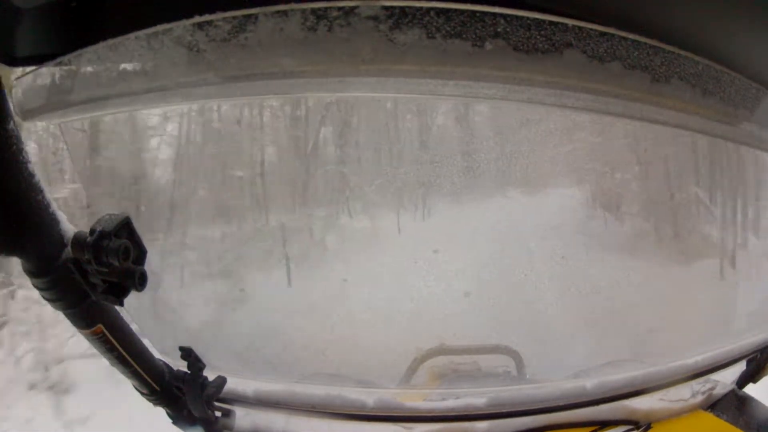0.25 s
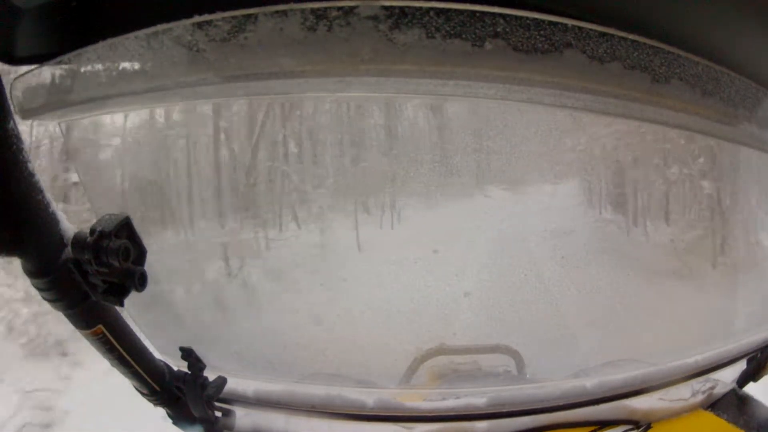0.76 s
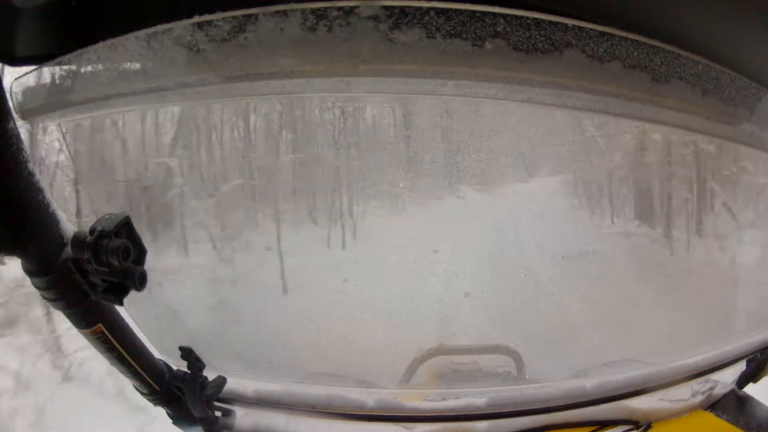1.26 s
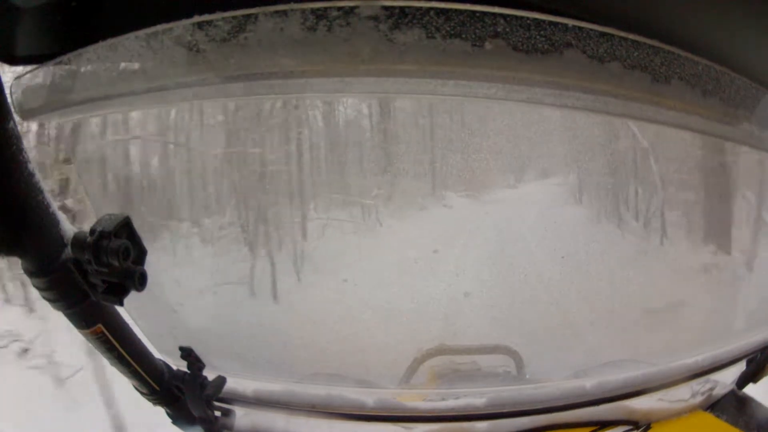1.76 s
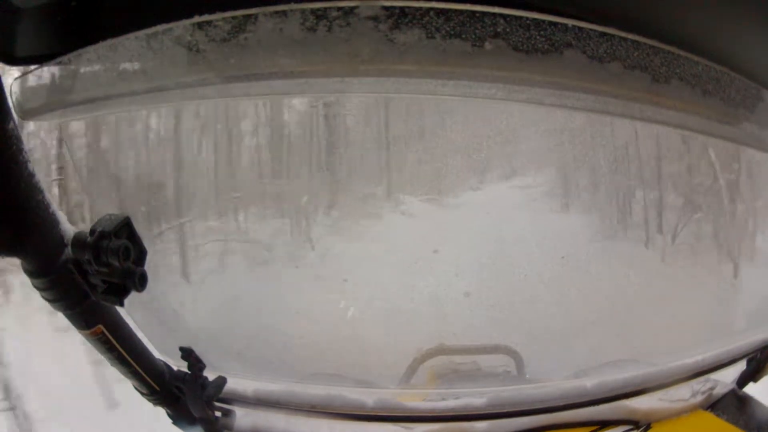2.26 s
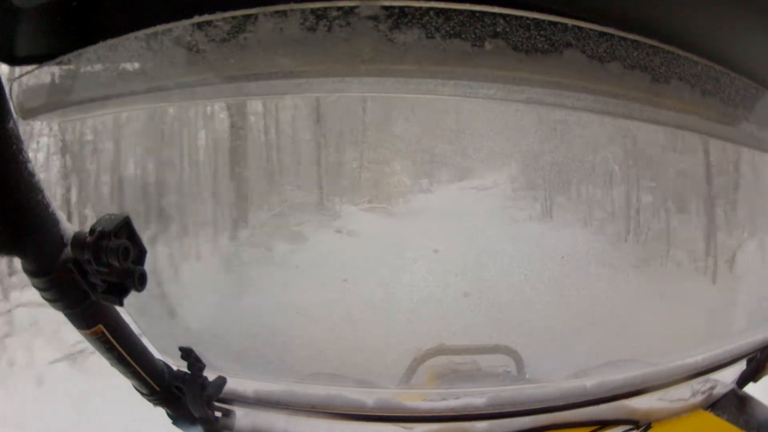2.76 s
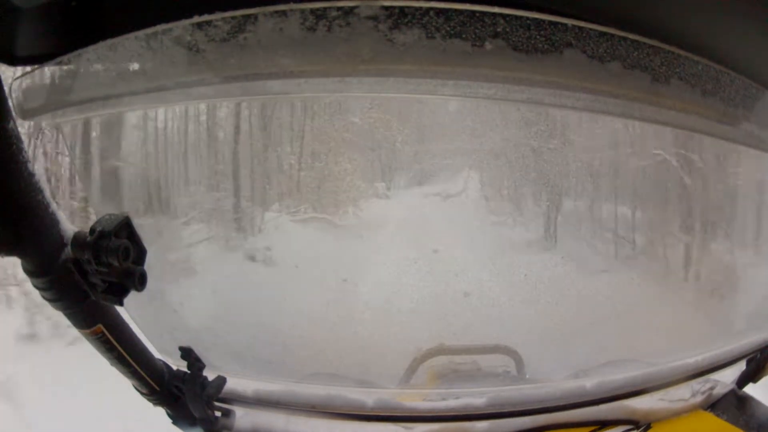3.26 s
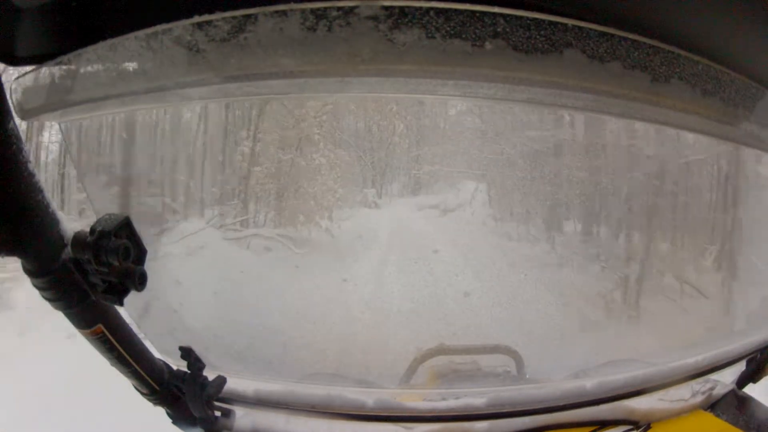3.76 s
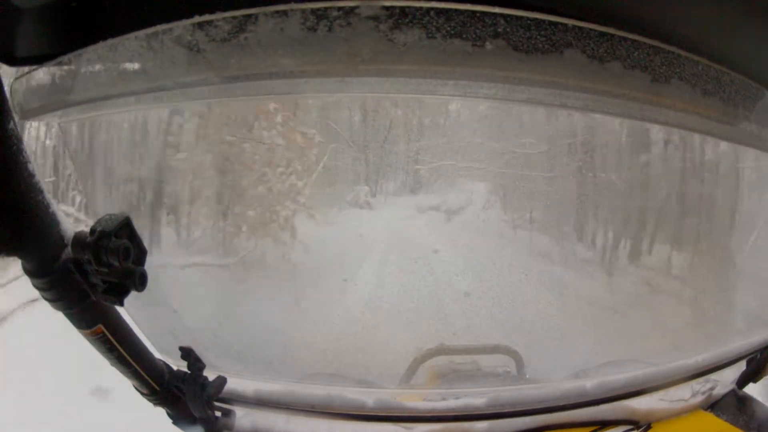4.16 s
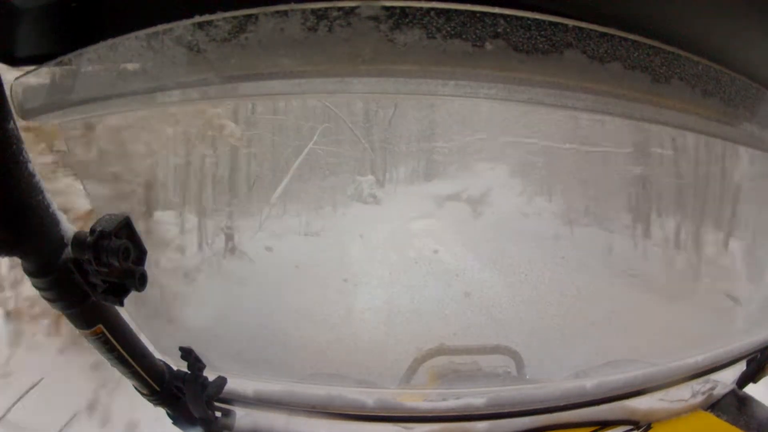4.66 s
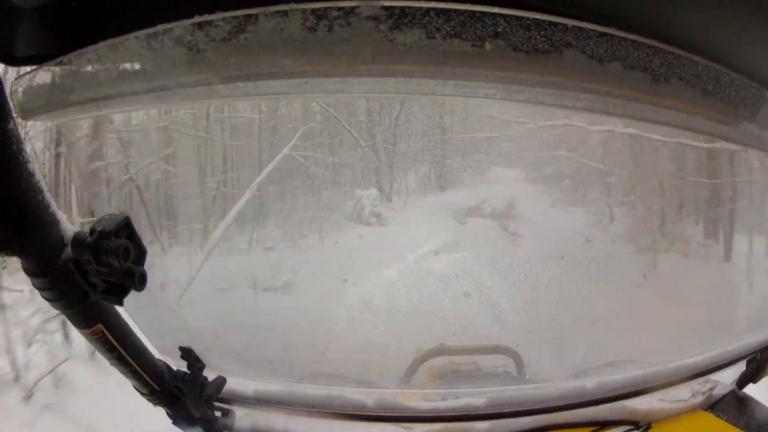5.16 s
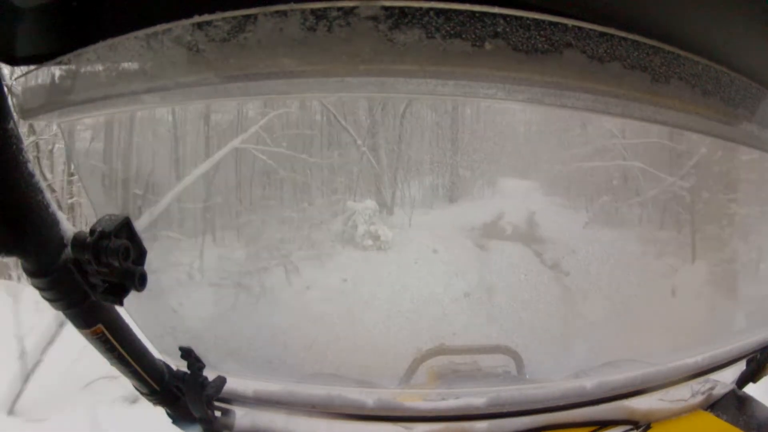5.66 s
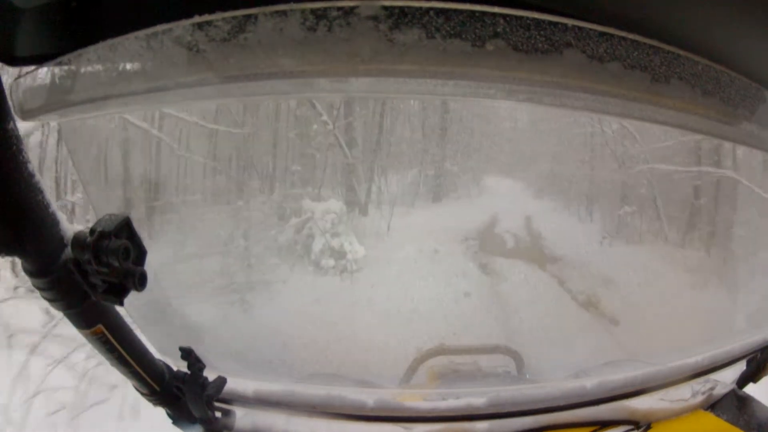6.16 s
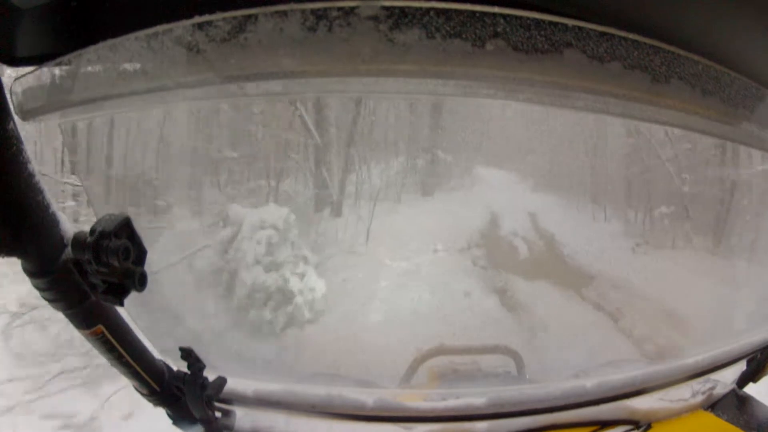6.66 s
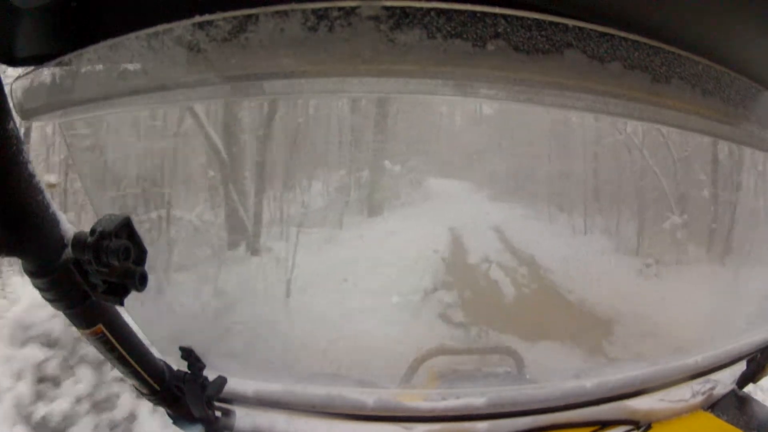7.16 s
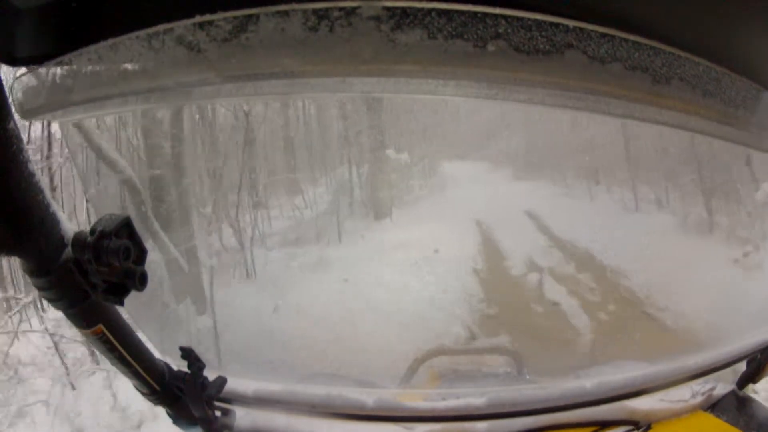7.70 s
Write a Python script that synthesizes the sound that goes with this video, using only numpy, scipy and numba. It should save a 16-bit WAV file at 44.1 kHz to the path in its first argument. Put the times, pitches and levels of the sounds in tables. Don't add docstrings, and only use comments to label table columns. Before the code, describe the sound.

Inside a small off-road vehicle, a two-cylinder engine booms low with a humming driveline and tyre roar. Pitch climbs for about four seconds, then falls to a slower, throbbing near-idle. The camera's hard case buzzes; its loose clamp knocks, densest around the slowdown, then rattles toward the end. Close, boxy, gritty sound that ducks after knocks.

```python
import sys
import numpy as np
from scipy import signal
from scipy.io import wavfile
from scipy.ndimage import uniform_filter1d, minimum_filter1d
from numba import njit

SR = 44100
rng = np.random.default_rng(int(sys.argv[2]) if len(sys.argv) > 2 else 0)


def magnitude_from_level(level_db):
    exponent = np.asarray(level_db, float) / 20
    return 10 ** exponent


def wrap_up_sound(samples):
    columns = np.atleast_2d(samples).T
    tamed = np.clip(columns, -1, 1)
    steps = np.round(tamed * 32767).astype(np.int16)
    wavfile.write(sys.argv[1], SR, steps)


N = 349713

# time in seconds, cycle rate in Hz.
ENGINE_CYCLE_HZ = [(0, 30.6), (.6, 30.6), (1.3, 35.2), (2.5, 35.8), (3.7, 38), (4.4, 35.6), (4.62, 29.7),
                   (4.9, 29.3), (5.2, 27), (5.42, 27.3), (5.62, 25.7), (6, 25.49), (6.25, 24.71),
                   (6.7, 25.23), (6.95, 25.87), (7.25, 25.29), (7.58, 24.84), (7.93, 25.57)]
# time in seconds, load in dB.
THROTTLE_LOAD_DB = [(0, -1), (.55, -2.5), (.9, 1.5), (1.4, 0), (2.1, -1.5), (2.4, 0), (3.0, 1), (3.7, 1.5),
                    (4.4, -0.5), (4.6, -3), (5.05, -3), (5.35, -6), (5.6, -2), (5.9, -12.5), (6.3, -7),
                    (6.8, -4), (7.3, -5.5), (7.93, -1.5)]
# time in seconds, sway in dB.
CAGE_SWAY_DB = [(0, -14), (.1, -14), (.9, -33), (4.55, -29), (4.68, -11), (4.8, -20.5), (5.17, -24),
                (5.27, -3), (5.39, -11), (5.49, -6.5), (5.7, -12.5), (5.97, -18), (6.12, -6), (7.1, -5),
                (7.28, -4), (7.7, -4.5), (7.93, 1.5)]
# multiple of the cycle rate, level in dB.
ENGINE_ORDERS = [(1, -12), (3, 6), (5, 2), (6, 0.5), (7, -4.5), (8, -4.5), (9, -11), (10, 3)]
# time in seconds, rate in Hz.
DRIVELINE_HZ = [(0, 85.1), (.65, 84.5), (.85, 87.3), (1.08, 86.9), (1.22, 92), (1.55, 92.7), (1.8, 96.7),
                (2.1, 96), (2.4, 100.2), (2.8, 100.5), (3.1, 105.6), (3.75, 111.2), (4.35, 112.7),
                (5.08, 92.36), (5.9, 78.2), (6.35, 75.24), (6.75, 70.43), (7.93, 62.4)]
# multiple of the driveline rate, level in dB.
MESH_ORDERS = [(3, -1), (4, -2.5), (5, -9)]
# frequency in Hz, width in Hz, level in dB.
CAB_MODES = [(286.4, 33.7, 1), (323.4, 56, 4), (395, 69, -12.5), (472, 91, -15.5)]
# frequency in Hz, width in Hz, level in dB.
SHELL_MODES = [(798, 92, -11), (1001.8, 66.6, -2.5), (1137, 280, -11), (1535, 500, -16), (1760, 121, -8),
               (1860, 80, -8.5), (2080, 373, -13.5), (2392, 18.6, -15)]
# frequency in Hz, width in Hz, level in dB.
THIN_MODES = [(3200, 580, 0.5), (3575, 380, 0), (3820, 140, -14), (4455, 120, -5), (5310, 600, -17.5),
              (5780, 83, -9.5)]
# start in seconds, end in seconds, frequency in Hz,
# width in Hz, level in dB.
CONTACTS = [(3.05, 4.3, 4400, 330, -43), (3.05, 4.3, 5120, 300, -44), (3.45, 4.33, 3900, 230, -38),
            (3.45, 4.33, 3450, 500, -37), (2.67, 2.86, 4450, 250, -43), (4.372, 4.418, 3500, 1700, -29),
            (5.715, 5.815, 1900, 260, -24), (5.91, 5.995, 1950, 350, -31), (2.53, 2.59, 3400, 1400, -33),
            (2.74, 2.81, 3400, 1400, -32), (4.938, 4.968, 3800, 2200, -33), (4.605, 4.64, 4000, 1800, -36),
            (5.2, 5.31, 3600, 2000, -40), (5.09, 5.18, 4000, 2500, -41), (5.9, 6.0, 3800, 2200, -44),
            (7.12, 7.26, 1850, 300, -25)]
# time in seconds, looseness in dB.
CLAMP_PLAY_DB = [(0, -19.5), (5.6, -9), (6.0, -6.5), (6.35, 1), (6.65, -5), (6.87, -19), (7.15, 4),
                 (7.37, 0), (7.93, 7)]
# time in seconds, peak in dB, ring in Hz, crack minus ring in dB.
CLAMP_KNOCKS = [(.22, -14.5, 1740, -8), (0.4547, -16.5, 1747, -11), (.6249, -2.5, 1770, -8.5),
                (1.1205, -13.5, 1758, -10.5), (2.1287, -17.5, 1770, -13), (2.5369, -13, 2084, -5),
                (2.6219, -8, 1800, -4), (2.7867, -12.5, 1911, -6.5), (3.5142, -3, 1870, 3),
                (3.8347, -11.5, 1770, -27), (4.1007, -2.5, 1739, -13), (4.2943, -7.5, 1860, -19),
                (4.3886, -13, 1970, -3), (4.4017, -9.5, 1840, -4.5), (4.456, -1, 1860, -7.5),
                (4.5378, -5, 2080, -8.5), (4.7001, -5, 1770, -12), (4.8474, -4, 1850, -17),
                (4.9533, -10.5, 1770, -20), (5.0867, -5, 1800, -3.5), (5.305, -8, 1800, -12),
                (5.6273, -13, 1620, -2.5), (5.7144, -12.5, 1850, -2.5), (5.825, -10.5, 2040, 2),
                (5.8538, -15.5, 2310, 2), (5.874, -25.5, 1970, 13), (7.1363, -9.5, 1860, -8),
                (7.208, -11, 1760, -11), (7.2665, -7.5, 1755, -17), (7.4276, -9.5, 1850, -9)]
# time in seconds, peak in dB.
CLAMP_TICKS = [(0.116, -27), (0.7728, -18), (7.392, -24), (6.7229, -18), (2.6856, -16.5), (2.7517, -15.5),
               (6.765, -21), (7.6525, -19), (6.804, -20), (4.625, -15.5), (4.9408, -12.5), (5.188, -20),
               (5.236, -16), (5.5414, -22.5), (5.5952, -20), (5.7923, -17.5), (6.4444, -18.5),
               (6.3037, -20.5), (6.562, -17), (6.9573, -19), (7.1886, -16), (7.3685, -13.5), (7.5088, -14),
               (7.5684, -13.5), (7.6278, -14.5), (7.7106, -17), (7.7477, -10), (7.8273, -8.5), (7.8648, -9),
               (7.888, -6.5)]


def level(x, db):
    return x * magnitude_from_level(db) / np.sqrt(np.mean(x ** 2))


def curves(table):
    s, *columns = np.transpose(table)
    return [np.interp(np.arange(N) / SR, s, c) for c in columns]


@njit
def svf(x, hz, width_hz):
    y, b, l = np.empty(len(x)), 0., 0.
    g, k = np.tan(np.pi * hz / SR), width_hz / hz
    for i in range(len(x)):
        v = (b + g * (x[i] - l)) / (1 + g * (g + k))
        b, l, y[i] = 2 * v - b, l + 2 * g * v, k * v
    return y


@njit
def duck(ear, top, release):
    gain, e = np.empty(len(ear)), 0.
    for i in range(len(ear)):
        e = max(abs(ear[i]), e * release)
        gain[i] = top / max(e, top)
    return gain


def body(x, modes):
    out = 0
    for k, (hz, width_hz, db) in enumerate(modes):
        once = svf(x, 1. * hz, 0.85 * width_hz)
        out = out + (-1) ** k * magnitude_from_level(db) * svf(once, 1. * hz, 0.85 * width_hz)
    return out


def noise():
    return rng.standard_normal(N)


def walk(rate_hz):
    k = int(SR / rate_hz)
    held = np.repeat(rng.standard_normal(N // k + 1), k)
    return 1.36 * uniform_filter1d(uniform_filter1d(held, k), k)[:N]


def stack(turns, orders, wobble_db, rate_hz, jitter_rad):
    return sum(magnitude_from_level(db + wobble_db * walk(rate_hz)) * np.sin(2 * np.pi * k * turns + jitter_rad * walk(rate_hz))
               for k, db in orders)


def knocks():
    out, t = np.zeros(N + 4000), np.arange(4000) / SR
    knock_ms, tick_ms, tick_hz, tick_crack_db = 3, 3.2, 1850, -5
    hits = [tuple(row) + (knock_ms,) for row in CLAMP_KNOCKS]
    hits += [(s, db, tick_hz, tick_crack_db, tick_ms) for s, db in CLAMP_TICKS]
    for s, peak_db, hz, crack_db, blow_ms in hits:
        blow = rng.standard_normal(len(t)) * np.minimum(t / 0.0012, 1) * np.exp(-1000 * t / blow_ms)
        grit = rng.standard_normal(len(t)) ** 3
        blow += .09 * grit * np.minimum(t / .002, 1) * np.exp(-t / .011)
        ring = body(blow, [(hz, 520, 0), (1.04 * hz, 110, -2)]) + .3 * body(blow, SHELL_MODES)
        snap = blow * (.6 + np.exp(-t / .002))
        crack = 2.2 * body(snap, THIN_MODES) + svf(snap, 4200., 4000.)
        hit = ring / abs(ring).max() + magnitude_from_level(crack_db) * crack / abs(crack).max()
        out[int(s * SR):][:len(t)] += magnitude_from_level(peak_db + 5.0) * hit
    return out[:N]


def contacts(shake):
    t, edge_s = np.arange(N) / SR, .008
    scrape = shake * noise()
    out = np.zeros(N)
    for start_s, end_s, hz, width_hz, db in CONTACTS:
        gate = np.clip(np.minimum(t - start_s, end_s - t) / edge_s, 0, 1)
        out += gate * level(body(scrape, [(hz, width_hz, 0)]), db)
    return out


def case(turns, load_db):
    buzz_db = -22.5 + 1.47 * load_db
    sizzle_db = -43.5 + 1.3 * load_db + 2.3 * walk(5.7)
    rattle_db = -29 + curves(CLAMP_PLAY_DB)[0]
    firing, phase = np.divmod(2 * turns + 1.54, 1)
    puff_size, tap_size = rng.standard_normal((N // 200, 2))[firing.astype(int)].T
    shake = 1.8 + np.exp(-phase / .3) * magnitude_from_level(2.5 * puff_size)
    shake = shake * magnitude_from_level(1.5 * walk(60) + 1.5 * walk(9))
    buzz = level(body(shake * noise(), SHELL_MODES), 0)
    sizzle = level(body(shake * noise(), THIN_MODES), 0)
    tap_db = 4.5 * np.clip(tap_size, -2, 1.4) + 2 * (firing % 2)
    blows = np.exp(-phase / .04) * magnitude_from_level(tap_db) * noise()
    taps = level(body(blows, SHELL_MODES[3:]), 0)
    taps = taps + level(body(blows, THIN_MODES), -10.5)
    taps = taps + 0 * blows + level(svf(blows, 3260.0, 4500.0), -11)
    return magnitude_from_level(buzz_db) * buzz + magnitude_from_level(sizzle_db) * sizzle + magnitude_from_level(rattle_db) * taps + contacts(shake)


def driveline(load_db):
    hz, = curves(DRIVELINE_HZ)
    t = np.arange(N) / SR
    clean_db = 0.5 - 0.04 * (hz - 85)
    coast_start_s, coast_end_s, coast_db = 4.42, 6.15, -11
    clean_db += coast_db * np.clip(np.minimum(t - coast_start_s, coast_end_s - t) / 0.078, 0, 1)
    clean_db = np.minimum(clean_db, 1)
    hz = hz * (1 + .007 * walk(6))
    mesh = stack(np.cumsum(hz) / SR, MESH_ORDERS, wobble_db=2.5, rate_hz=9, jitter_rad=.2)
    tones = level(0.25 * mesh + body(mesh, CAB_MODES), -0.8)
    roar = level(body(noise() * magnitude_from_level(1.5 * walk(30)), CAB_MODES), -4)
    return magnitude_from_level(-14 + 1.38 * load_db) * (magnitude_from_level(clean_db / 2) * tones + magnitude_from_level(-clean_db / 2) * roar)


def engine(turns, load_db):
    (cycle_hz,), (cage_db,) = curves(ENGINE_CYCLE_HZ), curves(CAGE_SWAY_DB)
    boom = np.sqrt(2) * magnitude_from_level(1.0 * walk(22)) * np.sin(4 * np.pi * turns + .15 * walk(25))
    boom_gain = np.hypot(magnitude_from_level(-20.5 + 1.1 * load_db), magnitude_from_level(cage_db))
    double = np.sqrt(2) * magnitude_from_level(0.8 * walk(21)) * np.sin(8 * np.pi * turns + 0.41 * walk(9.9))
    floor_hz, floor_width_hz = 124.7, 26.3
    panel = magnitude_from_level(-22) / (1 + (2 * (4 * cycle_hz - floor_hz) / floor_width_hz) ** 8) ** .5
    double_gain = np.maximum(panel, magnitude_from_level(cage_db - 19))
    orders = level(stack(turns, ENGINE_ORDERS, wobble_db=2.5, rate_hz=8, jitter_rad=.3), -1.5)
    rumble = level(svf(noise(), 180.0, 87.0), -12)
    frame_hz = 51.37 + 1.67 * walk(6)
    frame = np.sqrt(2) * magnitude_from_level(2.9 * walk(13)) * np.sin(2 * np.pi * np.cumsum(frame_hz) / SR)
    sway = level(svf(noise(), 40.0, 23.0), -27)
    return (boom_gain * boom + double_gain * double + magnitude_from_level(-18.5 + 1.75 * load_db) * (orders + rumble)
            + magnitude_from_level(-24) * frame + sway)


def scene():
    turns = .232 + np.cumsum(curves(ENGINE_CYCLE_HZ)[0]) / SR
    load_db, = curves(THROTTLE_LOAD_DB)
    return (engine(turns, load_db) + driveline(load_db) + case(turns, load_db) + knocks())[None]


def holes(x):
    hz, _, z = signal.stft(x, SR, "cosine", nperseg=2048)
    band = uniform_filter1d(abs(z) ** 2, size=8, axis=0)
    limit_db = -80.5 + np.interp(hz, [2500, 4000, 5200, 14200, 14700], [0, 5, 0, 0, 12])
    frame_db = 10 * np.log10(band[120:].mean(axis=0) + 1e-12)
    limit_db = limit_db[:, None] + .5 * np.minimum(frame_db - np.median(frame_db), 0)
    keep = (band > magnitude_from_level(2 * limit_db)) | (hz < 2500)[:, None]
    return signal.istft(z * keep, SR, "cosine", nperseg=2048)[1][:N]


def roll_off(x):
    return signal.sosfilt(signal.butter(12, 15820, fs=SR, output="sos"), x)


def record(dry):
    x = signal.sosfilt(signal.butter(2, 22, "high", fs=SR, output="sos"), dry[0])
    top, release_s = 0.84, 0.15
    gain = duck(x + 1.05 * svf(x, 1260.0, 2000.), top, np.exp(-1 / (release_s * SR)))
    x = x * uniform_filter1d(gain, size=201, origin=100)
    x = x * uniform_filter1d(minimum_filter1d(duck(x, .66, .995), size=32), size=32)
    x = signal.sosfilt(signal.butter(8, 5800, fs=SR, output="sos"), x)
    slow = signal.resample_poly(x, 40, 147)
    held = signal.resample_poly(np.repeat(slow, 4), 147, 160)[:N]
    held = signal.sosfilt(signal.butter(24, 15250, fs=SR, output="sos"), holes(held))
    return roll_off(held[None])


dry = scene()
out = record(dry)
wrap_up_sound(out)
```